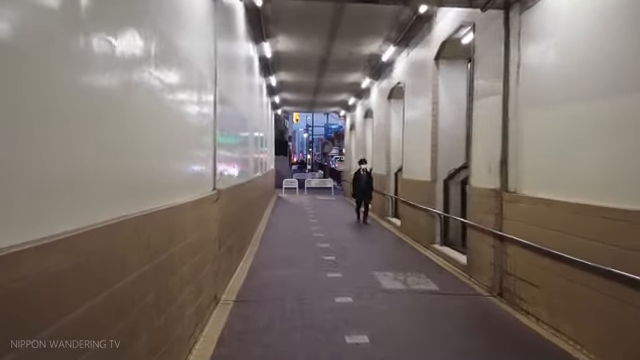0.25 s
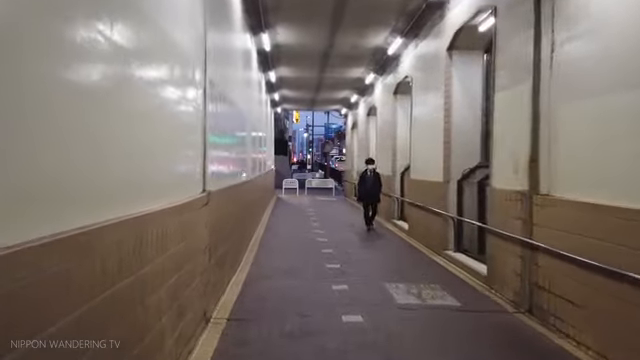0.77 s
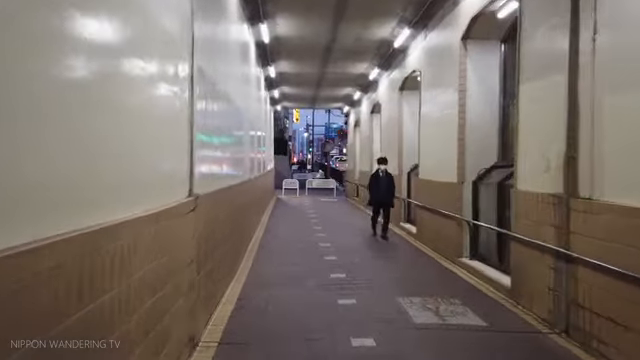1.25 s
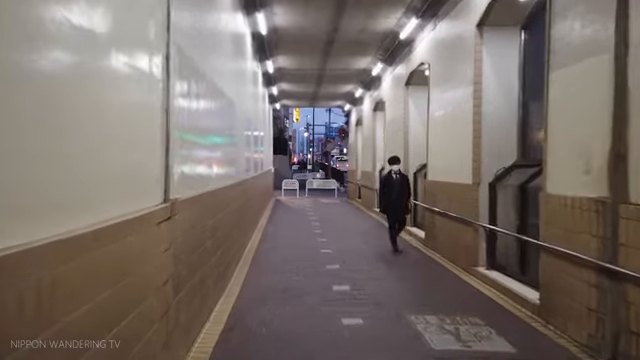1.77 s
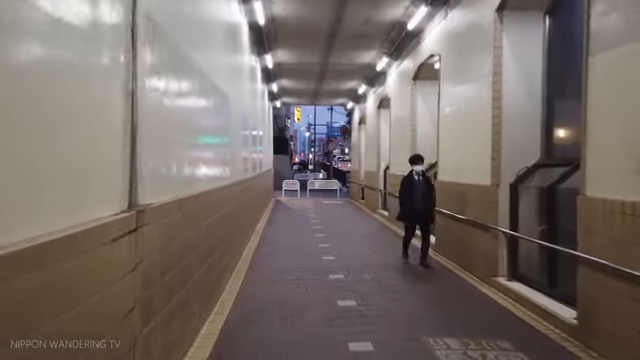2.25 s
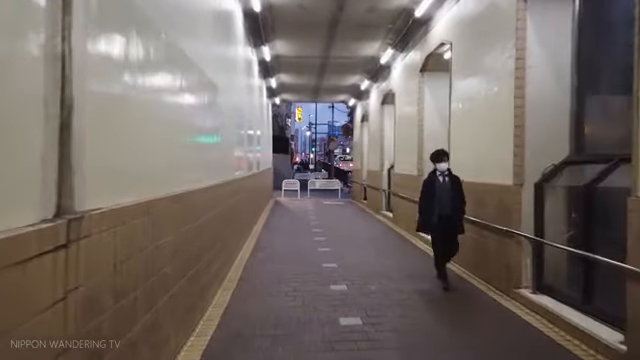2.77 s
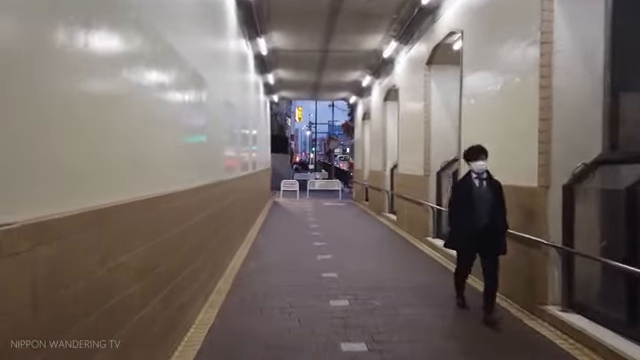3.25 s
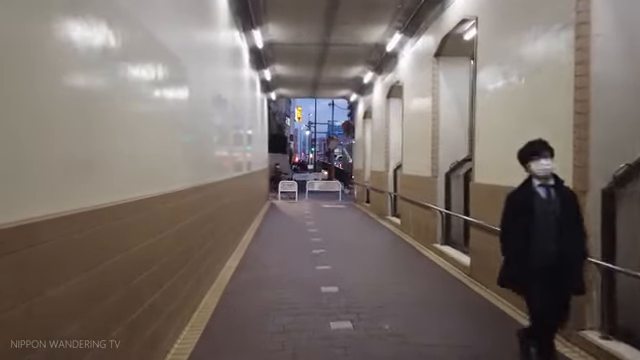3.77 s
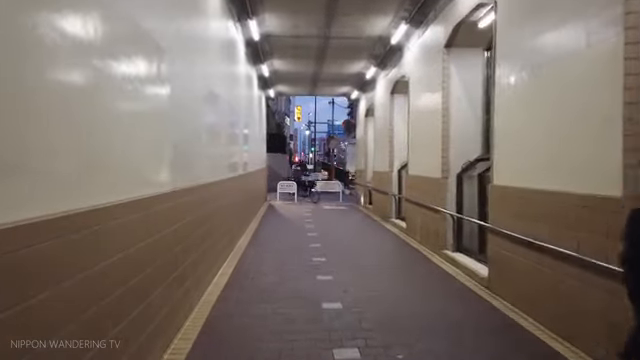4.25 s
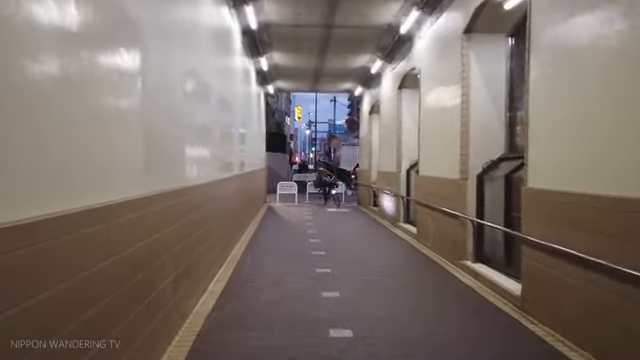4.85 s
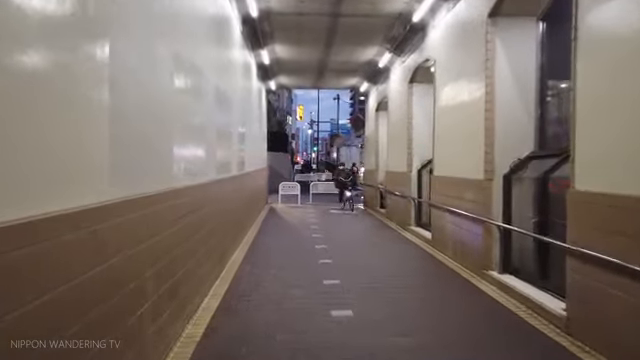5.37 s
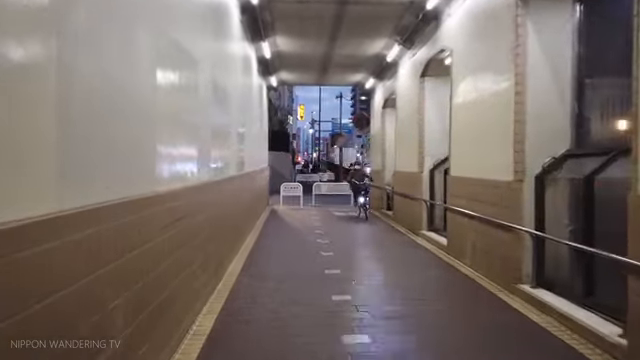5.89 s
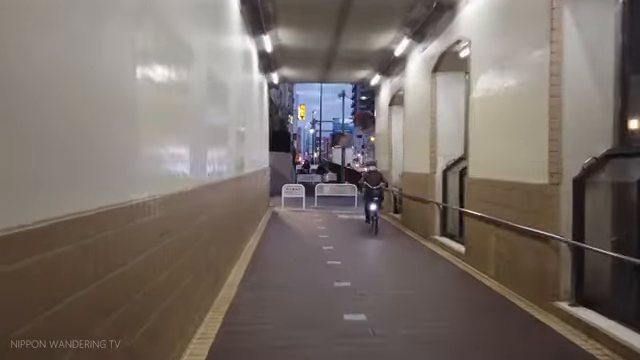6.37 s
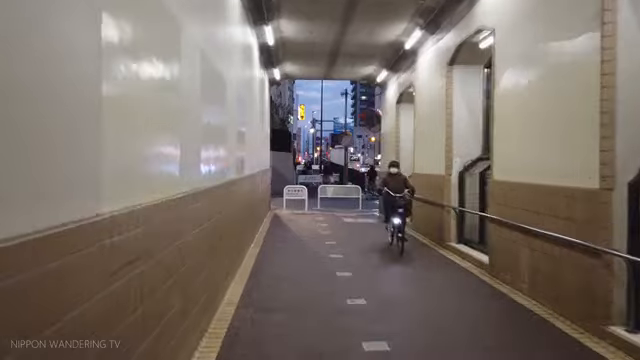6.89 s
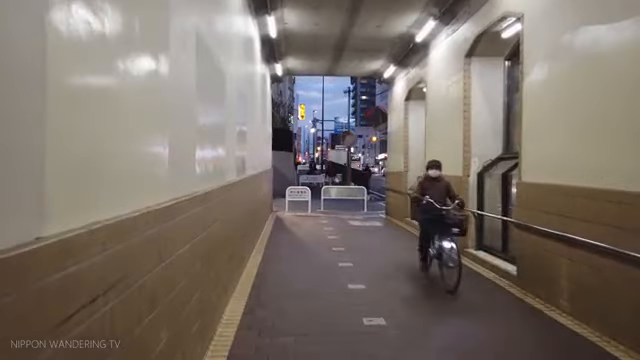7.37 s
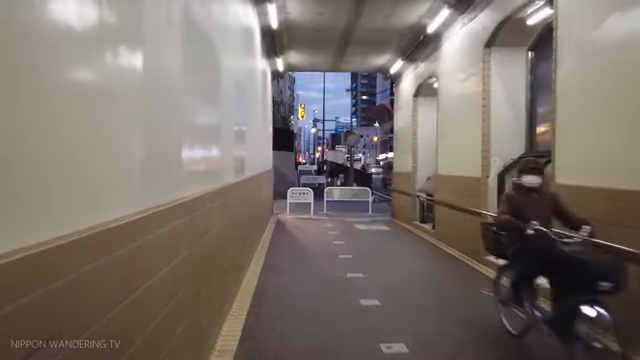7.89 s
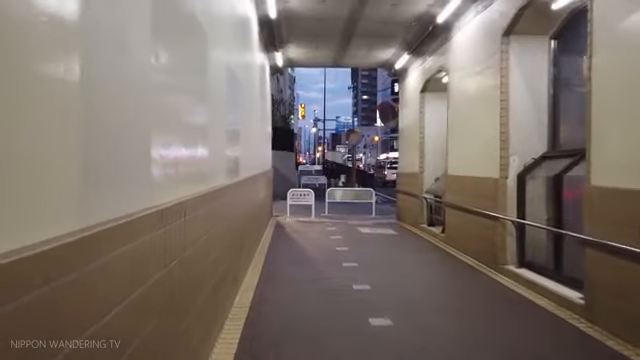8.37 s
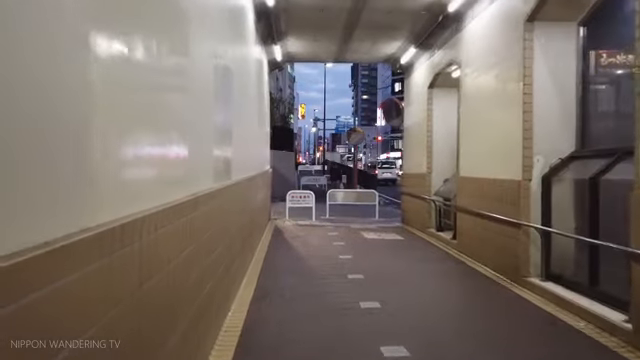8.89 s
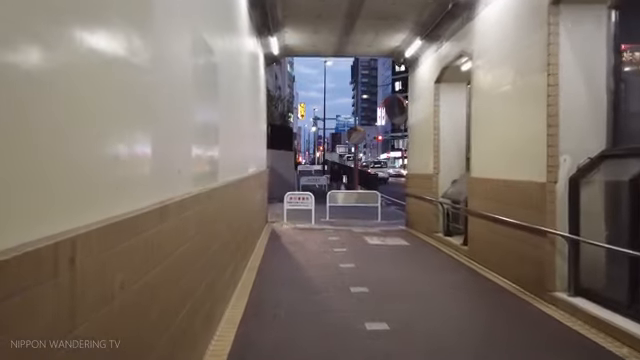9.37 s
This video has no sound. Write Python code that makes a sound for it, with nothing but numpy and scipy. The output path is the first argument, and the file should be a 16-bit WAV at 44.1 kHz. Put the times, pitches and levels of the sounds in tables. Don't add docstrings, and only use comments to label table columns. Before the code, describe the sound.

Inside a pedestrian underpass, heavy vehicles rumble and tyres wash by, brakes squeal thinly, a passing bicycle clinks, and open street air brightens.

```python
import sys
import numpy as np
from scipy import signal
from scipy.fft import rfft, irfft, next_fast_len
from scipy.io import wavfile
from scipy.ndimage import uniform_filter1d

SR = 44100
rng = np.random.default_rng(int(sys.argv[2]) if len(sys.argv) > 2 else 0)


def generate_wav(sig):
    pcm = np.round(np.clip(np.atleast_2d(sig).T, -1, 1) * 32767).astype(np.int16)
    wavfile.write(sys.argv[1], SR, pcm)


def volts_from_decibels(level):
    exponent = np.asarray(level, float) / 20
    return 10 ** exponent


N = 424683
TIME = np.arange(N) / SR

# (time [s], level [dB])
TRAFFIC_FLOW = [(0.0, -38), (1.02, -37.5), (2.09, -34), (2.97, -37), (3.0, -36), (4.66, -38), (4.93, -40),
                (5.02, -39), (5.28, -40.5), (7.32, -39), (7.48, -40), (7.51, -40), (7.59, -40),
                (9.63, -40.5)]
# (time [s], level [dB])
AXLE_LOADS = [(0.1, -22.5), (0.55, -23.5), (0.9, -32), (1.1, -22), (1.31, -16.5), (1.55, -24), (1.76, -24),
              (1.9, -24.5), (2.11, -31), (2.33, -23.5), (2.6, -29), (2.9, -22.5), (3.12, -26),
              (3.45, -30.5), (3.7, -27), (4.04, -28), (4.58, -32.5), (5.21, -31), (5.49, -31.5),
              (5.86, -35.5), (6.15, -32), (6.42, -32), (7.02, -33.5), (7.45, -27), (7.62, -39), (8.5, -36),
              (8.75, -37), (9.41, -38)]
# (time [s], approach [s], departure [s], level [dB])
CLOSE_PASSES = [(0.0, .1, 0.15, -6), (1.52, 0.24, 1, 0.5), (2.15, 0.58, 0.88, -7), (3.45, .15, 0.45, -8),
                (4.66, .08, 0.21, -7.5), (5.05, 0.14, 0.46, -4.5), (5.92, 0.13, 0.1, -6.5),
                (6.15, 0.21, 0.88, -5.5), (8.02, 0.062, 0.091, -9), (8.8, 0.44, 0.39, -10.5),
                (9.5, 0.26, 0.25, -15)]
# (frequency [Hz], level [dB])
SHAKE_COLOUR = [(4, -14), (9, 6.5), (17, 6), (24, 6.5), (32, -49)]
# (frequency [Hz], level [dB])
RUMBLE_COLOUR = [(15, 2), (30, -4.5), (60, -6.5), (150, -13), (250, -12.5), (400, -17.5), (650, -27),
                 (1000, -50)]
# (frequency [Hz], level [dB])
ROAR_COLOUR = [(300, -10), (550, -2.5), (1000, -0.5), (1400, -4.5), (2000, -11.5), (3000, -21.5),
               (3600, -26), (4200, -41.5)]
# (frequency [Hz], level [dB])
TYRE_EDGE_COLOUR = [(1500, -5), (2200, -4), (3000, -1), (3700, -7.5), (4300, -16), (5500, -23)]
# (frequency [Hz], level [dB])
HISS_COLOUR = [(3000, -5.5), (4300, -0.5), (5500, 0), (7000, -1), (9000, -6.5), (11000, -14)]
# (frequency [Hz], level [dB])
AIR_COLOUR = [(6000, 4.5), (9000, 2.5), (12000, 5.5), (15000, 3), (17000, -36)]
# (frequency [Hz], likeness [-1 to 1])
MICROPHONE_LIKENESS = [(30, 0.98), (60, 0.93), (130, 0.83), (290, 0.56), (640, -0.13), (1400, -0.013)]
# (time [s], length [s], start [Hz], end [Hz], level [dB])
ENGINE_DRONES = [(0.3, .65, 46.5, 44.8, -32), (0.8, .7, 32.5, 27.5, -31.5), (1.7, .25, 27.5, 25.7, -27),
                 (2.2, .2, 27.5, 26.5, -29), (3.2, .8, 27.2, 28.6, -33), (4.55, .25, 26.1, 26.2, -38),
                 (2.33, .3, 43, 42.5, -33), (2.92, .15, 41.2, 41.8, -39), (4.25, .75, 41.5, 40.3, -35),
                 (5.4, 1.0, 40.5, 39.2, -37), (3.0, .5, 59, 59.5, -41), (3.7, .5, 60, 61, -35),
                 (6.75, .5, 58.3, 57.3, -32), (8.42, .7, 40.5, 40, -34.5), (9.3, .4, 33, 31.3, -31),
                 (0.1, .7, 102.5, 99.5, -41), (1.5, .4, 102, 100, -42), (1.4, .7, 133.5, 129, -40),
                 (7.95, .35, 118, 117.5, -44.5), (2.06, .66, 259, 254.5, -39.5), (2.9, .55, 254, 252, -45),
                 (3.95, .3, 245, 242, -46), (7.15, .2, 233, 232, -44), (6.5, .6, 406, 408, -48.5)]
# (time [s], level [dB], left minus right [dB])
CLINKS_HEARD = [(4.714, -55, 3.0), (5.001, -49, -1.5), (5.037, -59, 2.0), (5.44, -59, 2.5),
                (5.6196, -60, 0.5), (5.7159, -60, 0.0), (6.0586, -52, 6.0), (6.1414, -48, -1.0),
                (6.6184, -53, 6.5), (7.5863, -62, 3.5), (7.877, -46, -0.5), (8.0092, -46, -2.0),
                (8.1768, -40, -0.5)]
# (frequency [Hz], level [dB], time to fall 60 dB [s])
CLINK_TONES = [(14310, 1, .06), (14450, -1, .05), (14190, -4, .05)]
# (frequency [Hz], level [dB], time to fall 60 dB [s])
CLOSEST_CLINK_TONES = [(10900, -9, .06), (12200, -12, .06), (13330, -8, .03)]
# (time [s], level [dB], left minus right [dB])
CLOTH_TICKS = [(0.8944, -59, 7.5), (0.8999, -46, 7.5), (0.9133, -46, 12), (4.421, -55, 0),
               (5.7154, -47, -2.0)]
# (time [s], length [s], start [Hz], end [Hz], level [dB])
PAD_GRIPS = [(2.325, 0.009, 8550, 8850, -61), (2.8, 0.15, 8040, 8040, -54), (2.94, .1, 7950, 7850, -56),
             (3.07, 0.086, 8050, 8220, -50), (3.62, .11, 8040, 8100, -48.5), (3.75, 0.095, 8120, 8190, -49),
             (3.89, .09, 8200, 8510, -56), (4.0, 0.12, 8360, 8270, -54), (4.35, .1, 8480, 8590, -50),
             (4.34, .12, 8150, 8300, -58), (4.51, .2, 8100, 8290, -48), (4.5, .15, 7800, 7760, -64),
             (4.77, 0.23, 8400, 8380, -58), (5.4, 0.054, 8360, 8330, -49), (5.74, 0.058, 8470, 8380, -55.5),
             (5.86, 0.11, 8430, 8440, -63), (7.48, 0.12, 8400, 7950, -59.5), (7.58, 0.22, 7770, 7750, -70)]
# (time [s], length [s], level [dB])
DISC_RINGS = [(4.33, .19, -57), (4.72, .25, -60), (5.25, .53, -58), (5.82, .17, -64), (6.27, .58, -58.5),
              (6.92, .22, -65), (7.42, .09, -62)]


def curve(table):
    s, *columns = np.transpose(table)
    return [np.interp(TIME, s, column) for column in columns]


def walk(rate, count=N):
    hold = int(SR / rate)
    levels = rng.standard_normal(N // hold + 1)[:count // hold + 1]
    steps = np.repeat(levels, hold)
    return 1.3 * uniform_filter1d(uniform_filter1d(steps, hold), hold)[:count]


def wash(colour, flicker_db, rate):
    size = next_fast_len(N)
    octave = np.log2(np.maximum(np.fft.rfftfreq(size, 1 / SR), 1))
    hz, db = np.transpose(colour)
    like_hz, likeness = np.transpose(MICROPHONE_LIKENESS)
    like = np.clip(np.interp(octave, np.log2(like_hz), likeness), -1, 1)
    gain = volts_from_decibels(np.interp(octave, np.log2(hz), db, -150, -150))
    mid, side = rfft(rng.standard_normal((2, size))) * gain
    pair = np.sqrt(1 + like) * mid + np.sqrt(1 - like) * side * np.array([[1], [-1]])
    out = 0
    for centre in np.arange(np.floor(np.log2(hz[0])), np.log2(hz[-1]) + 1):
        share = np.cos(np.pi / 2 * np.clip(octave - centre, -1, 1)) ** 2
        out = out + irfft(pair * share, size)[:, :N] * volts_from_decibels(flicker_db * walk(rate))
    return out / np.sqrt(np.mean(out ** 2))


def swell(t, start, length, rise, fall):
    before = np.maximum(start - t, 0)
    after = np.maximum(t - start - length, 0)
    return np.exp(-(before / rise) ** 2 - after / fall)


def swells(rows):
    t = TIME[::128]
    total = sum(gain * swell(t, s, 0, rise, fall) for s, rise, fall, gain in rows)
    return np.interp(TIME, t, total)


def tone(hz, wander, rate):
    wandering_hz = hz * (1 + wander * walk(rate, count=len(hz)))
    turns = np.cumsum(wandering_hz) / SR + rng.random()
    return np.sqrt(2) * np.sin(2 * np.pi * turns)


def add(track, note, rise, fall, wander, wander_rate, flutter_db, flutter_rate):
    start, length, hz, end_hz, db = note
    span = slice(int(max(start - 3 * rise, 0) * SR), int((start + length + 8 * fall) * SR))
    t = TIME[span]
    flutter = flutter_db * walk(flutter_rate, count=len(t))
    level = volts_from_decibels(db + flutter) * swell(t, start, length, rise, fall)
    slide_hz = np.interp(t, [start - rise, start + length], [hz, end_hz])
    track[span] += level * tone(slide_hz, wander, wander_rate)


def passage(x, t60, direct):
    t = np.arange(SR) / SR
    tail = rng.standard_normal((2, SR)) * np.exp(-np.log(1000) * t / t60)
    tail /= np.sqrt(np.sum(tail ** 2, axis=1, keepdims=True))
    tail[:, 0] += direct
    return signal.fftconvolve(np.atleast_2d(x), tail, axes=1)[:, :N]


def shaking_structure():
    rise_s, fall_s, rest_db = 0.049, 0.079, -46
    load = volts_from_decibels(rest_db) + swells((s, rise_s, fall_s, volts_from_decibels(db)) for s, db in AXLE_LOADS)
    shake = wash(SHAKE_COLOUR, .5, 2.5)
    power = uniform_filter1d(np.mean(shake ** 2, axis=0), int(.15 * SR))
    return shake / np.sqrt(power + 0.064) * load


def engine_rumble(flow_db):
    return wash(RUMBLE_COLOUR, 0.54, 2.3) * volts_from_decibels(-32.5 + 0.73 * flow_db)


def tyres_and_air(flow_db):
    far_db = -11
    passes = swells((s, rise / np.sqrt(2), fall / 2, volts_from_decibels(2 * db)) for s, rise, fall, db in CLOSE_PASSES)
    close_db = 10 * np.log10(volts_from_decibels(2 * far_db) + passes)
    mouth_s, mouth_rise_s, mouth_db = 8.04, .35, 8.5
    opening_db = mouth_db * swell(TIME, mouth_s + mouth_rise_s, N / SR, mouth_rise_s, 1)
    roar = wash(ROAR_COLOUR, 0.13, 4.7) * volts_from_decibels(-38 + flow_db)
    edge = wash(TYRE_EDGE_COLOUR, 0.36, 3.7) * volts_from_decibels(-47 + 1.22 * close_db)
    gusts = volts_from_decibels(0.9 * walk(14))
    hiss = wash(HISS_COLOUR, 0.41, 7.1) * volts_from_decibels(-58 + 0.75 * close_db + 0.23 * opening_db)
    grit_db = 1.3 * walk(90)
    air = wash(AIR_COLOUR, .5, 12.0) * volts_from_decibels(-62 + 0.65 * close_db + opening_db + grit_db)
    return roar + edge + gusts * (hiss + air)


def traffic():
    flow_db = curve(TRAFFIC_FLOW)[0] + 38
    return shaking_structure() + engine_rumble(flow_db) + tyres_and_air(flow_db)


def engines():
    fade_s, beat_db = .16, 2
    out = np.zeros(N)
    for note in ENGINE_DRONES:
        add(out, note, fade_s, fade_s / 2, .003, 4.0, beat_db, 4.0)
    return out


def ringing(modes):
    t = np.arange(SR // 4) / SR
    ring = 0
    for hz, db, t60 in modes:
        ring = ring + volts_from_decibels(db) * np.sin(2 * np.pi * hz * t) * np.exp(-np.log(1000) * t / t60)
    return ring * np.minimum(t / .002, 1)


def strikes(events, ring):
    kicks = np.zeros((2, N))
    for s, db, pan_db in events:
        kicks[:, int(s * SR)] = volts_from_decibels(db + np.array([pan_db, -pan_db]) / 2)
    return signal.fftconvolve(kicks, ring[None], axes=1)[:, :N]


def metal_clinks():
    clinks = strikes(CLINKS_HEARD, ringing(CLINK_TONES))
    clinks = clinks + strikes(CLINKS_HEARD[-1:], ringing(CLOSEST_CLINK_TONES))
    return volts_from_decibels(-6) * clinks + volts_from_decibels(-6) * passage(clinks, .3, .01)


def cloth_ticks():
    t = np.arange(SR // 40) / SR
    snap = np.diff(rng.standard_normal(len(t) + 1)) * np.exp(-t / 0.001)
    return volts_from_decibels(-3.5) * strikes(CLOTH_TICKS, snap)


def brakes():
    pads, discs, squeak = np.zeros((4, N)), np.zeros((3, N)), np.zeros(N)
    grip_s, release_s = 0.022, 0.015
    for k, note in enumerate(PAD_GRIPS):
        add(pads[k % len(pads)], note, grip_s, release_s, .009, 130.0, 2.5, 35.0)
    disc_hz, disc_rise_s, disc_fall_s = 8900, 0.035, 0.021
    for k, (start, length, db) in enumerate(DISC_RINGS):
        note = (start, length, disc_hz, disc_hz, db + 5.5)
        add(discs[k % len(discs)], note, disc_rise_s, disc_fall_s, .0045, 200.0, 2.0, 18.0)
    chirp = (4.187, 0, 3370, 3225, -42.5)
    add(squeak, chirp, .035, .012, .013, 120.0, 1.5, 60.0)
    pad_squeals = sum(passage(squeal, .45, .05) for squeal in pads)
    disc_squeals = sum(passage(ring, .35, .05) for ring in discs)
    return pad_squeals + disc_squeals + passage(squeak, 1.2, 0.8)


def scene():
    return traffic() + engines() + metal_clinks() + cloth_ticks() + brakes()


def masked(x, under_db, up_db, down_db, weak_db):
    frame = dict(window="cosine", nperseg=2048, noverlap=1024)
    spectrum = signal.stft(x, **frame)[2]
    group, first, bands = 4, 140, 140
    treble = spectrum[:, first:first + bands * group]
    power = np.abs(treble.reshape(2, -1, group, treble.shape[-1])) ** 2
    db = 10 * np.log10(np.mean(power, axis=(0, 2)) + 1e-18)
    khz = np.arange(len(db)) * group * SR / 2048000
    gap = khz[:, None] - khz
    narrow = (8.5 / (khz + first * SR / 2048000)) ** 2
    reach = narrow * np.where(gap > 0, up_db * gap, -down_db * gap)
    limit = np.max(db[None] - reach[:, :, None], axis=1) - under_db
    around = uniform_filter1d(uniform_filter1d(db, size=15, axis=0), size=3, axis=1)
    heard = db > np.maximum(limit, around - weak_db)
    keep = np.ones(spectrum.shape[1:])
    keep[first:first + len(db) * group] = np.repeat(heard, group, axis=0)
    return signal.istft(spectrum * keep, **frame)[1][:, :N]


def top_cut(x):
    return signal.sosfilt(signal.butter(12, 15620, fs=SR, output="sos"), x)


def record(dry):
    heard = masked(dry, under_db=23.3, up_db=4.4, down_db=27.0, weak_db=1.9)
    top = signal.ellip(12, .2, 90, 14980, fs=SR, output="sos")
    mix = signal.sosfilt(top, heard)
    return top_cut(mix)


dry = scene()
out = record(dry)
generate_wav(out)
```